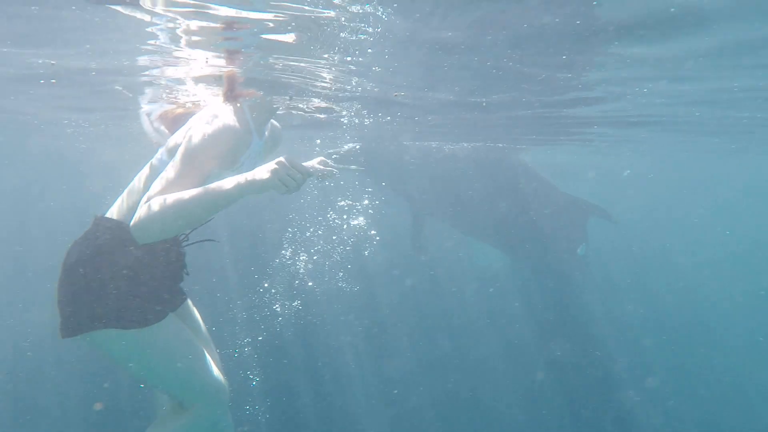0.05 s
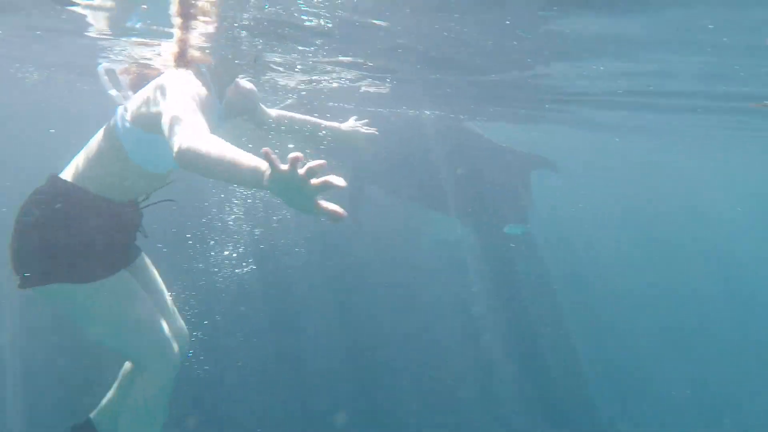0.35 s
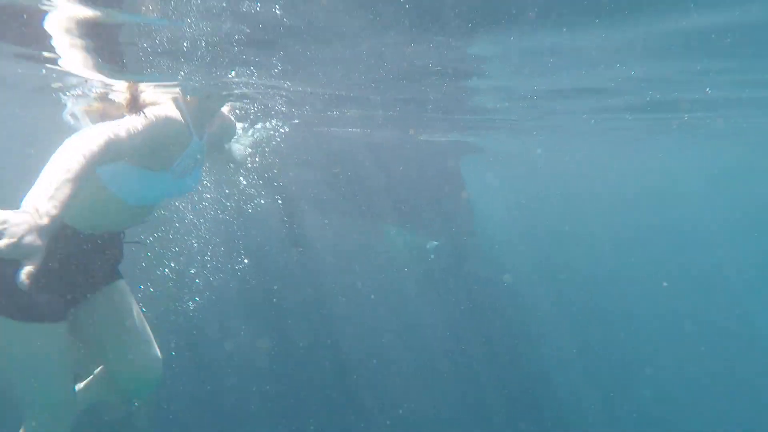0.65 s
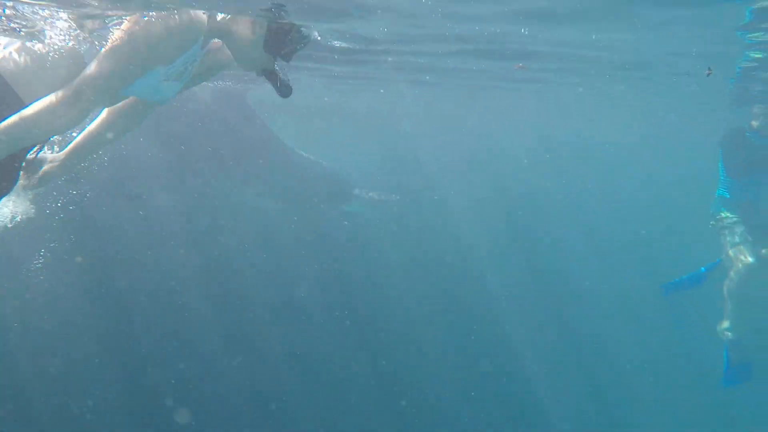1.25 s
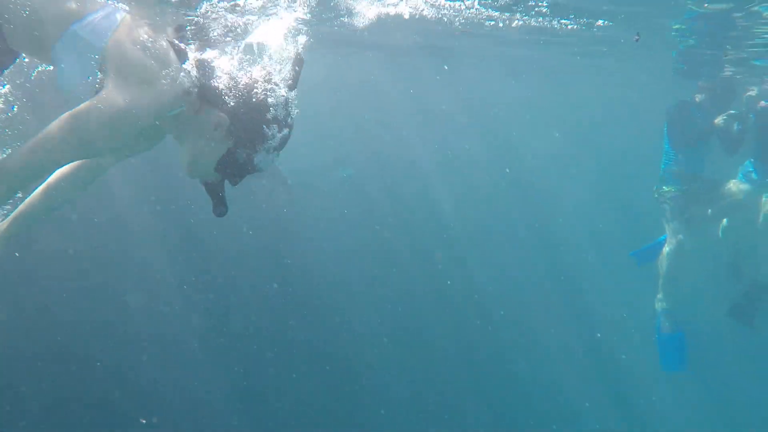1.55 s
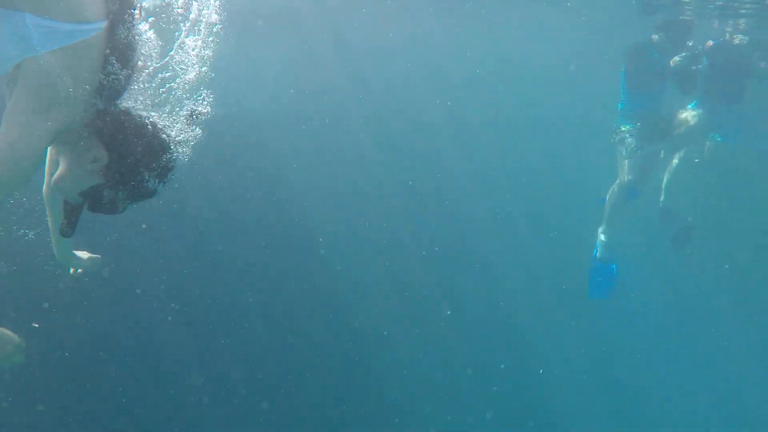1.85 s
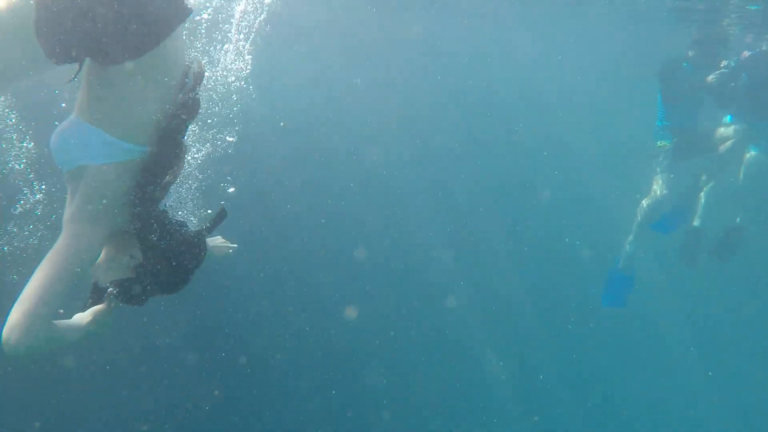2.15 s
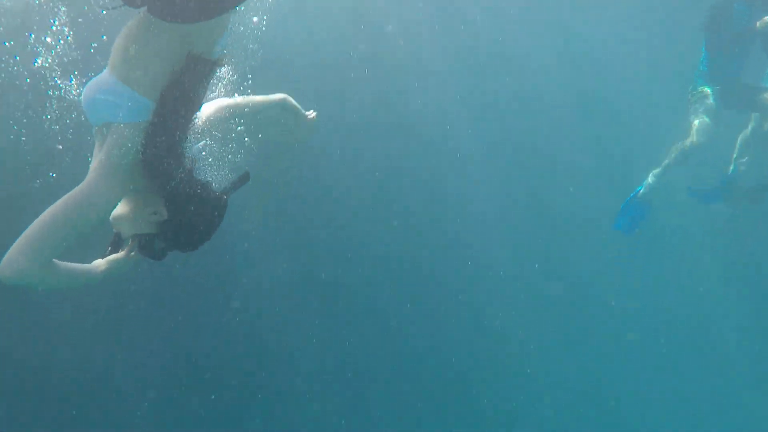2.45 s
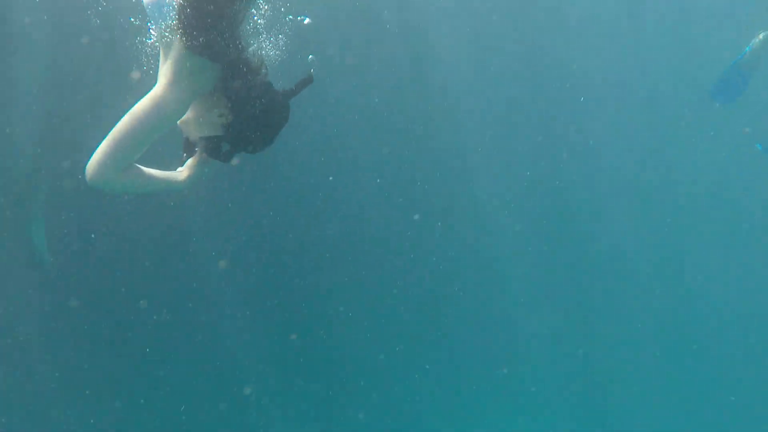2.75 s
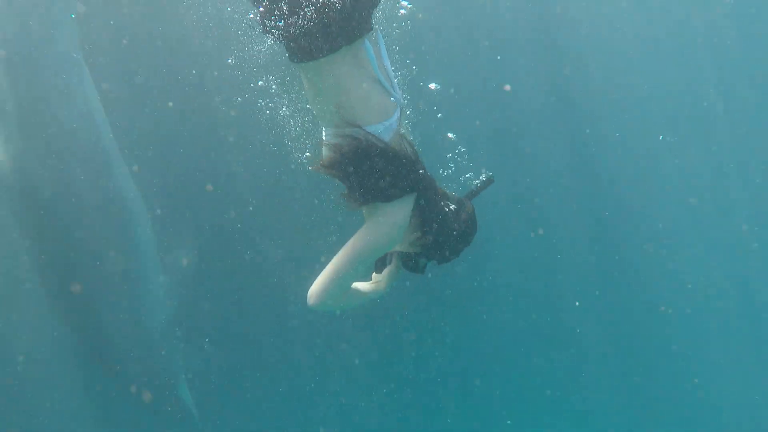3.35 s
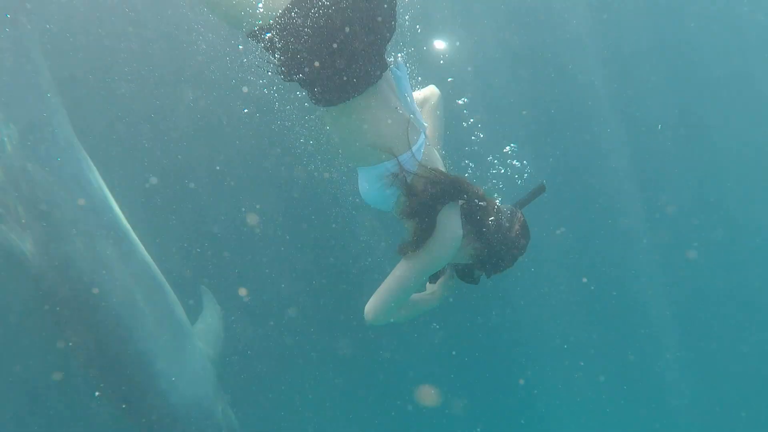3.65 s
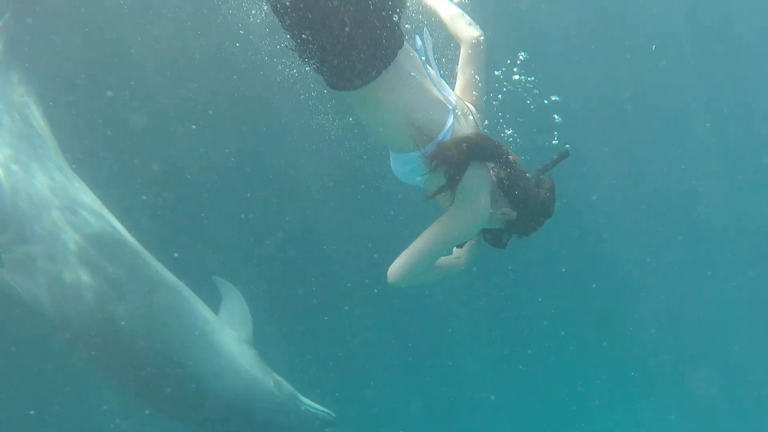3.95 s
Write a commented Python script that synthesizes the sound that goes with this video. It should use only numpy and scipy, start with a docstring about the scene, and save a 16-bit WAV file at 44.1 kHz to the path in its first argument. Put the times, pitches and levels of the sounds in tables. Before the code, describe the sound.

Dolphins whistle underwater, thin and very high: one faint call at about 2.2 seconds, a short one near 2.9, then a closer one sweeping up and down from 3 to 4. Louder water rumbles, sloshes and burbles at the microphone throughout, with gulping bubbles growing stronger late. Small sharp snaps dot a faint hiss, and dull knocks land near 1.1, 1.9 and 3.8 seconds.

```python
"""Dolphins from a swimmer's camera

Under water, dolphins whistle near a camera carried by a swimmer. Water rumbles and sloshes
around the housing, small bubbles burble, large ones gulp, and sharp snaps and dull knocks
prick a faint sea hiss. The recorder mirrors the highest whistle notes."""
import sys
import numpy as np
from scipy import signal
from scipy.fft import rfft, irfft
from scipy.io import wavfile
from scipy.ndimage import uniform_filter1d, map_coordinates

SR = 44100
rng = np.random.default_rng(int(sys.argv[2]) if len(sys.argv) > 2 else 0)


def store_pcm(level_fs):
    """Save levels as 16-bit WAV."""
    pcm = np.round(np.clip(level_fs, -1, 1) * 32767).astype(np.int16)
    wavfile.write(sys.argv[1], SR, np.atleast_2d(pcm).T)


N = 176400
TIME = np.arange(N) / SR


def amp(db):
    """Decibels to gain."""
    return 10 ** (np.asarray(db) / 20)


def unit(x):
    """Scales to rms 1."""
    return x / np.sqrt(np.mean(x ** 2) + 1e-20)


def gain_at(spectrum, hz):
    """Reads a (Hz, dB) spectrum as gains."""
    points_hz, db = np.transpose(spectrum)
    return amp(np.interp(np.log(hz + 1), np.log(points_hz), db))


def level(table, column):
    """Reads one dB column of a timed table as a gain for every sample."""
    rows = np.array(table)
    return amp(np.interp(TIME, rows[:, 0], rows[:, column]))


def add(mix, start, sound):
    """Mixes a sound in at a time in seconds."""
    part = mix[max(round(start * SR), 0):][:len(sound)]
    part += sound[:len(part)]


def colour(x, spectrum):
    """Causal filter with the given spectrum, falling away above its last point."""
    hz = abs(np.fft.fftfreq(len(x), 1 / SR))
    gain = gain_at(spectrum, hz) / np.maximum(hz / spectrum[-1][0], 1) ** 2
    minimum_phase = np.exp(np.conj(signal.hilbert(np.log(gain))))
    return np.fft.ifft(np.fft.fft(x) * minimum_phase).real


def wander(rate_hz):
    """Random drift of rms 1, moving at up to about rate_hz."""
    hz = np.fft.rfftfreq(N, 1 / SR)
    return unit(irfft(rfft(rng.standard_normal(N)) * np.exp(-(hz / rate_hz) ** 2), N))


def noise(spectrum, patch_db):
    """Shaped noise that swells in uneven patches."""
    return unit(colour(rng.standard_normal(N), spectrum) * amp(patch_db * wander(rate_hz=20.4)))


def pops(per_s, spread_db):
    """Random impulses, a few of them large."""
    size = amp(spread_db * np.minimum(rng.exponential(1, N), 4))
    return size * rng.choice([-1, 1], N) * (rng.random(N) < per_s / SR)


# Four bands of moving water, right at the camera. Each row: frequency in Hz, relative level in dB.
RUMBLE_SPECTRUM = [(8, -21), (20, -9), (32, 3), (70, -4.5), (100, -8.5), (170, -40)]
SLOSH_SPECTRUM = [(45, -39.5), (90, -2.5), (150, 0), (280, -8.5), (450, -14.5), (850, -49)]
BURBLE_SPECTRUM = [(180, -33), (300, -1), (360, -0.5), (430, -14.5), (500, -5.5), (600, -16), (880, -17.5),
                   (1150, -53)]
SPLASH_SPECTRUM = [(500, -19.5), (850, 0), (1400, 0), (2000, -5), (2600, -12.5), (4000, -35)]
# How they rise and fall. Each row: time in seconds, then rumble, slosh, burble and splash
# in dB, before each band's trim.
WATER_LEVELS = [(0.07, -42, -39, -61, -66.5), (0.2, -29, -44, -49.5, -65.5),
                (0.4, -37.0, -26.5, -34.5, -62.5), (0.55, -33, -37.5, -43, -61),
                (0.68, -27, -29.5, -37, -58.5), (0.92, -30.5, -31.5, -43.5, -57.5),
                (1.13, -23.5, -21.5, -38, -54.5), (1.4, -30.5, -37.5, -43.5, -53.5),
                (1.62, -25.5, -26.5, -33.5, -54), (1.9, -28.0, -34, -33, -51), (2.1, -24.5, -39, -36, -54),
                (2.45, -32.5, -36.5, -33.5, -53), (2.65, -20, -36, -36, -52),
                (2.85, -26.5, -36, -34.5, -52), (3.06, -22.5, -36.5, -31, -54.5),
                (3.37, -27, -36.0, -31, -53), (3.6, -27, -29, -32.5, -53), (3.8, -28.5, -28, -30.5, -52),
                (3.99, -22, -29, -28, -56)]


def water():
    """Water pushed around the housing, from rumble up to surface splash."""
    rumble = amp(1) * level(WATER_LEVELS, column=1) * noise(RUMBLE_SPECTRUM, patch_db=1.5)
    slosh = amp(0.5) * level(WATER_LEVELS, column=2) * noise(SLOSH_SPECTRUM, patch_db=4.5)
    burble = amp(-1) * level(WATER_LEVELS, column=3) * noise(BURBLE_SPECTRUM, patch_db=5)
    splash = amp(-0.5) * level(WATER_LEVELS, column=4) * noise(SPLASH_SPECTRUM, patch_db=1.5)
    return rumble + slosh + burble + splash


def bubble(hz, decay_s, glide):
    """An air pocket swells and rings down; its pitch starts low by the share glide and settles."""
    swell_cycles, glide_s = 0.84, 0.0038
    t = TIME[:SR // 3]
    turns = hz * (t - glide * glide_s * (1 - np.exp(-t / glide_s)))
    swell = 1 - np.exp(-(t * hz / swell_cycles) ** 2)
    return swell * np.exp(-t / decay_s) * np.sin(2 * np.pi * turns)


def small_bubbles(sizes=24, per_s=150, ring_cycles=4.5, db_per_octave=-11):
    """A swarm of small bubbles of many sizes, following the level of the burble."""
    swarm, pitches = np.zeros(N), np.geomspace(300, 1300, sizes)
    for hz in pitches:
        ring = bubble(hz, ring_cycles / hz, glide=0.17) * amp(db_per_octave * np.log2(hz / pitches[0]))
        swarm += signal.oaconvolve(pops(per_s / sizes, spread_db=3), ring)[:N]
    return amp(-5.5) * unit(swarm) * level(WATER_LEVELS, column=3)


# The sea's hiss and sizzle, and the ring of the housing around the microphones.
# Each row: frequency in Hz, relative level in dB.
HISS_SPECTRUM = [(1500, -8), (2500, 3), (3100, -0.5), (3700, 2.5), (4400, 2), (5600, 3.5), (7200, -0.5),
                 (9100, -1.5), (10500, -6.5), (12000, -13.5), (15000, -29.5)]
SIZZLE_SPECTRUM = [(7000, -21.5), (8500, -5.5), (9400, -2), (10200, -5.5), (11000, -11), (13000, -17.5)]
HOUSING_RING = [(600, -15.5), (2000, -1.5), (2900, -2), (3700, 8), (4400, -2.5), (5600, 6), (7300, -7.5),
                (9200, 2.5), (11000, -10), (14000, -29)]
# The faint background. Each row: time in seconds, then hiss, crackle and sizzle in dB.
SEA_LEVELS = [(.07, -74.5, -73, -73.5), (.7, -68, -91, -74.5), (.85, -63.5, -70, -86.5),
              (1.5, -61.5, -61.5, -72), (1.75, -57, -60, -59.5), (2.1, -61, -83, -66),
              (2.25, -61, -67.5, -58), (3.2, -61, -70, -61), (3.95, -57.5, -80, -60.5)]


def sea():
    """Distant hiss, a fine crackle that rings the housing, and a thin high sizzle."""
    ticks = pops(per_s=200, spread_db=5.5)
    hiss = level(SEA_LEVELS, column=1) * noise(HISS_SPECTRUM, patch_db=1.6)
    crackle = level(SEA_LEVELS, column=2) * unit(colour(ticks, HOUSING_RING))
    sizzle = level(SEA_LEVELS, column=3) * noise(SIZZLE_SPECTRUM, patch_db=1.1)
    return hiss + crackle + sizzle


# Single bubbles close to the camera.
# Each row: start in seconds, final pitch in Hz, gain in dB, decay time in seconds.
CLOSE_BUBBLES = [(0.158, 148.7, -1.5, 0.0072), (0.356, 408, -19, 0.013), (.366, 156.3, -3, 0.0093),
                 (0.401, 315, -20, 0.014), (0.649, 395, -16, 0.0072), (0.811, 424, -18.5, 0.0069),
                 (0.906, 64.2, -5.5, 0.012), (1.028, 176, -10, 0.01), (1.107, 190, -1.5, 0.0091),
                 (1.139, 113.5, -7.5, 0.021), (1.352, 303, -11, 0.0039), (1.509, 82, 0.5, 0.011),
                 (1.527, 660, -20.5, 0.0043), (1.63, 370, -13, 0.0035), (1.646, 3700, -45.5, .006),
                 (1.762, 55, 6, 0.0087), (1.81, 3500, -46.5, 0.01), (1.902, 837, -32, 0.0091),
                 (2.099, 875, -35.5, 0.0077), (2.201, 192, -4, 0.0062), (2.309, 267.8, -10.5, 0.02),
                 (2.7, 448, -14, 0.011), (2.722, 97, -7, 0.019), (2.755, 1210, -42, 0.022),
                 (2.78, 150, -0.5, 0.0094), (2.895, 326, -12, 0.033), (2.928, 880, -30, 0.0086),
                 (3.054, 966, -34.5, 0.01), (3.113, 378.8, -4, 0.023), (3.173, 520, -18, 0.016),
                 (3.209, 1730, -37.5, 0.013), (3.233, 495, -19, 0.014), (3.401, 903, -33, 0.024),
                 (3.461, 350, -11.5, 0.013), (3.464, 489.4, -25, 0.086), (3.537, 340, -6.5, 0.0058),
                 (3.603, 292, 1.5, 0.012), (3.707, 343, -4, 0.0077), (3.742, 312, -9.5, 0.015),
                 (3.829, 1320, -27, 0.0089), (3.843, 374.1, -2.5, 0.04), (3.893, 368, -4.5, 0.013),
                 (3.921, 75, -8, 0.0045)]


def gulps(deep_below_hz=430):
    """Air pockets ring one by one: the deep ones bend up, the higher ones sink."""
    out = np.zeros(N)
    for start, hz, db, decay_s in CLOSE_BUBBLES:
        glide = 0.53 if hz < deep_below_hz else -0.1
        add(out, start, amp(db) * bubble(hz, decay_s, glide))
    return out


# Gushes of water at the camera. Each row: start in seconds, gain in dB.
WATER_GUSHES = [(.251, -36.5), (0.409, -31.5), (0.584, -36.5), (0.641, -25), (1.592, -29.5), (1.853, -23),
                (2.306, -24.5), (3.11, -24.5), (3.163, -22), (3.92, -29)]


def gushes(attack_s=0.0026, decay_s=0.017, band_hz=(250, 640)):
    """Sudden shoves of churned water, each a short swell of low noise."""
    swell = np.zeros(N)
    for start, db in WATER_GUSHES:
        add(swell, start, amp(db) * np.minimum(TIME / attack_s, 1) * np.exp(-TIME / decay_s))
    band = signal.butter(4, band_hz, "bandpass", fs=SR, output="sos")
    return swell * unit(signal.sosfilt(band, rng.standard_normal(N)))


# Snaps heard through the housing. Each row: start in seconds, relative peak in dB,
# tone gain up to 3.5 kHz in dB, tone gain from 9.5 kHz in dB.
SHARP_SNAPS = [(.261, -48.5, -22, -19), (0.772, -49, -29, -24), (0.891, -37, -12, -11.5),
               (1.141, -33.5, -25, -8), (1.1796, -41, -31, -10), (1.295, -41.5, -38, -10),
               (1.41, -42, -37, -10.5), (1.5603, -42.5, -23, 2), (1.6898, -33, -11, 2),
               (1.7187, -29, -20.5, -19), (1.847, -38, -8, 4), (1.928, -35.5, -5, -37),
               (1.9525, -39.5, -10, -23), (1.9758, -35.5, -25, -17), (2.0162, -37.5, -22, -27.5),
               (2.463, -39.5, -11, -26), (2.591, -35.5, -11, -14), (2.822, -41.5, -35, -13.5),
               (2.9192, -36, -19, -15), (3.3741, -33, -8.5, -15.5), (3.578, -36.5, -10.5, -7.5),
               (3.6679, -38, 12, -15), (3.702, -22, -9, -24)]


def snaps(decay_s=0.0006, tail_s=0.0035, tail_db=-14, trim_db=2.5):
    """Sharp cracks that ring the housing, each with its own brightness."""
    out, t = np.zeros(N), TIME[:2048]
    envelope = np.exp(-t / decay_s) + amp(tail_db) * np.exp(-t / tail_s)
    for start, db, low_db, high_db in SHARP_SNAPS:
        ring = colour(rng.standard_normal(len(t)) * envelope, HOUSING_RING)
        crack = colour(ring, [(3500, low_db), (5600, -14.5), (9500, high_db), (15000, high_db)])
        add(out, start, amp(db + trim_db) * crack / abs(crack).max())
    return out


# Knocks on the housing itself. Each row: start in seconds, peak in dB.
HOUSING_KNOCKS = [(1.1063, -13), (1.93, -16), (1.955, -19.5), (2.016, -28), (3.708, -19), (3.829, -16.5)]
# Their dull tone. Each row: frequency in Hz, relative level in dB.
KNOCK_SPECTRUM = [(150, -4), (500, 4.5), (900, 4.5), (1150, 0), (1450, 3), (1900, -14), (3000, -28),
                  (6000, -44)]


def knocks(decay_s=0.0002):
    """Dull taps on the housing: an impulse with a trace of noise, its treble damped."""
    out, t = np.zeros(N), TIME[:2048]
    impact = (t == 0) + 0.26 * np.exp(-t / decay_s) * rng.standard_normal(len(t))
    tap = colour(impact, KNOCK_SPECTRUM)
    for start, db in HOUSING_KNOCKS:
        add(out, start, amp(db) * tap / abs(tap).max())
    return out


# A whistle's second harmonic. Each row: frequency where it lands in Hz, gain in dB.
OCTAVE_GAINS = [(11500, -8), (12700, 5), (13500, -3), (15000, -19)]
BAND_EDGE_HZ = 15400


def whistle(contour, octave_db=0, trim_db=-3.5, flutter_db=3.2, waver=0.0035, fade_s=0.012):
    """A gliding tone with a quick, rough flutter; its octave is heard only when the pitch is low."""
    times, pitches, _ = np.transpose(contour)
    row = np.interp(TIME, times, np.arange(len(times)))
    spline_hz = map_coordinates(pitches, [row], order=3, mode="nearest")
    hz = uniform_filter1d(spline_hz, size=500) * (1 + waver * wander(rate_hz=300))
    phase = 2 * np.pi * np.cumsum(hz) / SR
    gate = np.clip(np.minimum(TIME - times[0], times[-1] - TIME) / fade_s + 1, 0, 1)
    flutter = amp(flutter_db * wander(rate_hz=240))
    envelope = np.sqrt(2) * amp(trim_db) * gate * level(contour, column=2) * flutter
    octave_gain = amp(octave_db) * gain_at(OCTAVE_GAINS, 2 * hz) * (2 * hz < BAND_EDGE_HZ)
    return envelope * (np.sin(phase) + octave_gain * np.sin(2 * phase))


# The dolphins' calls: one far off, one short, then one near the microphones.
# Each row: time in seconds, pitch in Hz, relative level in dB.
FAR_CALL = [(2.17, 12600.0, -65), (2.22, 12000.0, -57), (2.29, 10600.0, -65), (2.32, 9250.0, -66),
            (2.36, 8400.0, -59), (2.445, 9300.0, -63.5), (2.54, 8620.0, -58), (2.575, 9000.0, -55),
            (2.64, 10100.0, -66)]
SHORT_CALL = [(2.84, 7070, -61), (2.87, 7120, -63), (2.895, 6140, -57), (2.912, 5560, -53),
              (2.926, 5850, -60)]
NEAR_CALL = [(2.985, 8900, -63), (3.03, 11200, -58), (3.05, 12000, -49), (3.08, 12300, -52),
             (3.115, 11950, -54), (3.16, 11100, -66), (3.21, 10950, -68), (3.26, 10150, -59),
             (3.305, 9050, -51), (3.355, 7800, -54), (3.405, 8600, -47), (3.455, 9000, -41),
             (3.515, 8050, -48), (3.55, 6580, -54), (3.575, 6320, -52), (3.598, 7100, -59),
             (3.63, 10100, -61), (3.665, 12250, -44), (3.705, 13200, -47), (3.76, 12200, -44),
             (3.81, 10230, -56), (3.87, 10800, -64), (3.945, 11930, -45), (3.999, 11300, -60)]


def dolphins(surface_db=-6, surface_t60_s=0.055):
    """Three whistles, made to shimmer by many faint reflections from the rippled surface."""
    direct = whistle(SHORT_CALL, octave_db=-13) + whistle(FAR_CALL) + whistle(NEAR_CALL)
    t = TIME[:SR // 4]
    paths = rng.standard_normal(len(t)) * amp(-60 * t / surface_t60_s)
    reflected = signal.fftconvolve(direct, paths / np.linalg.norm(paths))[:N]
    return direct + amp(surface_db) * reflected


def scene():
    """Under water both microphones hear the same sound."""
    mix = dolphins() + gulps() + small_bubbles() + gushes() + water() + sea() + snaps() + knocks()
    return np.array([mix, mix])


# Mirrored treble inside the camera. Each row: frequency where it lands in Hz, gain in dB.
MIRROR_GAINS = [(9000, -50), (10800, -24), (11800, -9), (12400, -5), (13200, -9), (14200, -19),
                (15200, -27)]
# The top treble leans to the left channel. Each row: frequency in Hz, left minus right in dB.
TREBLE_LEAN = [(10200, 0), (11500, 2), (12500, 5.5), (14000, 4)]


def record(dry, recorder_hz=24000, start_s=0.066, twist_rad_per_db=0.28):
    """The recorder opens, mirrors the treble about half its rate, leans it left and limits the band."""
    hz = np.fft.rfftfreq(N, 1 / SR)
    image = (np.conj(signal.hilbert(dry)) * np.exp(2j * np.pi * recorder_hz * TIME)).real
    spectrum = rfft(dry) + rfft(image) * gain_at(MIRROR_GAINS, hz) * (hz < BAND_EDGE_HZ)
    lean_db = 20 * np.log10(gain_at(TREBLE_LEAN, hz))
    lean = amp(lean_db / 2) * np.exp(0.5j * twist_rad_per_db * lean_db)  # phase parts along with level
    stereo = irfft(spectrum * np.array([lean, 1 / lean]), N)
    opening = np.clip((TIME - start_s) / 0.003, 0, 1)
    lowpass = signal.firwin(511, BAND_EDGE_HZ, window=("kaiser", 9), fs=SR)
    return signal.oaconvolve(stereo * opening, lowpass[None], "same")


dry = scene()
out = record(dry)
store_pcm(out)
```